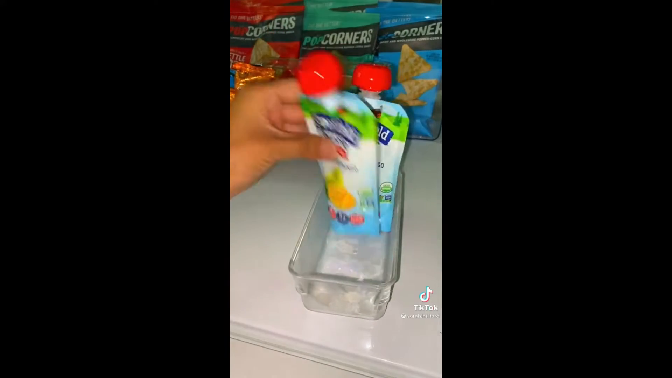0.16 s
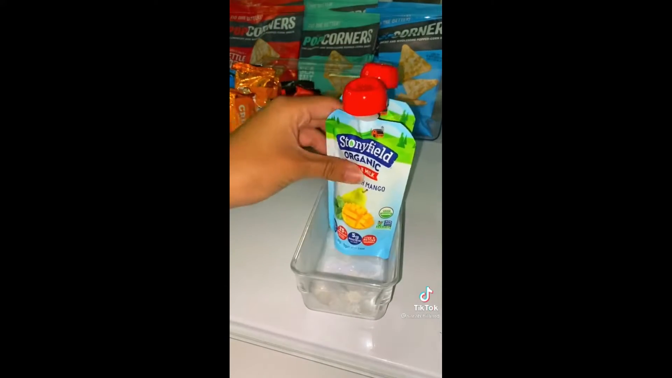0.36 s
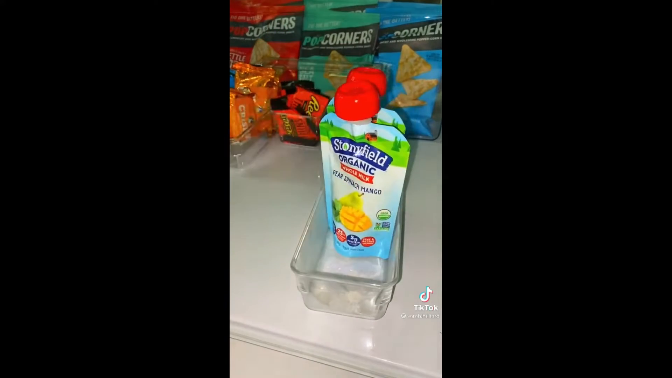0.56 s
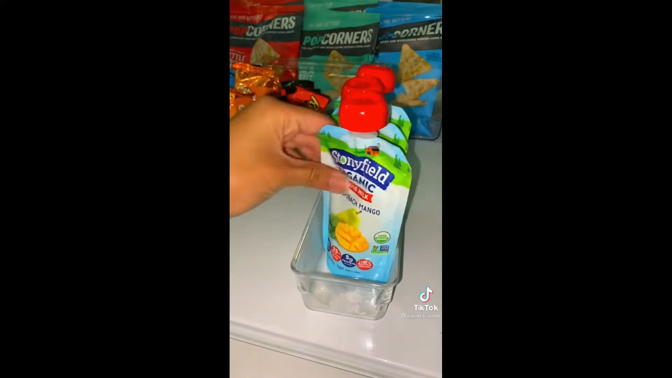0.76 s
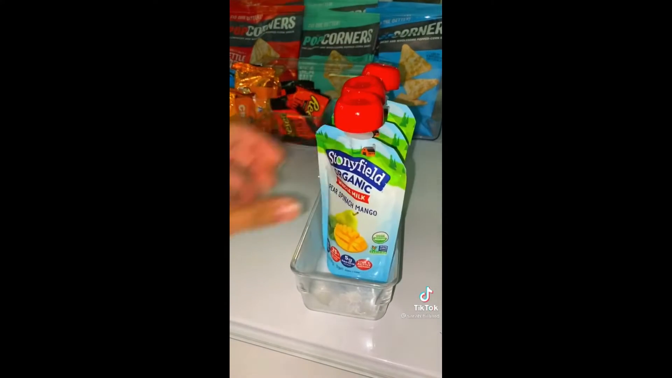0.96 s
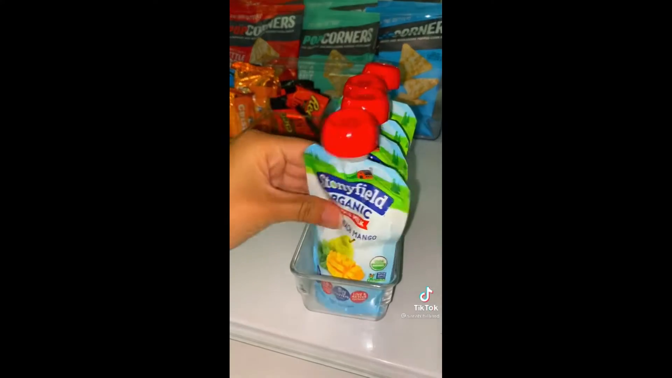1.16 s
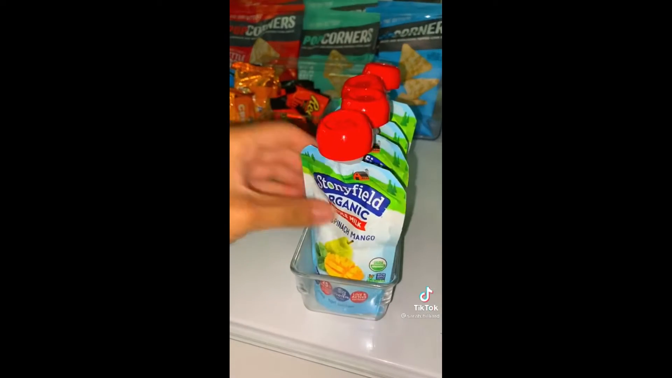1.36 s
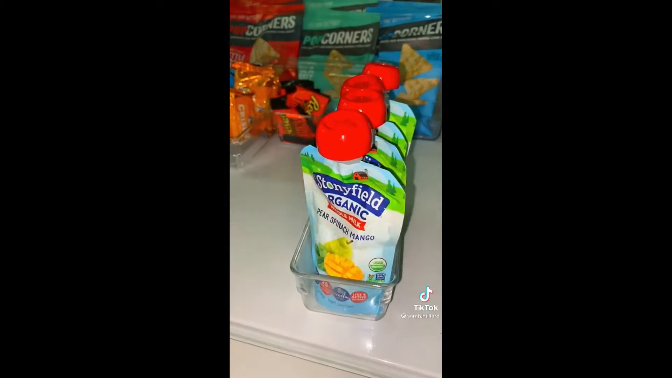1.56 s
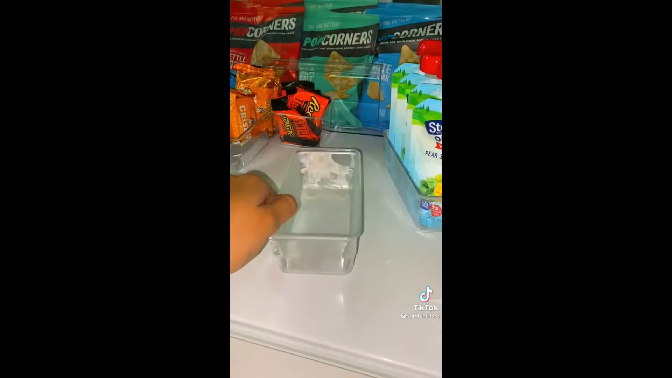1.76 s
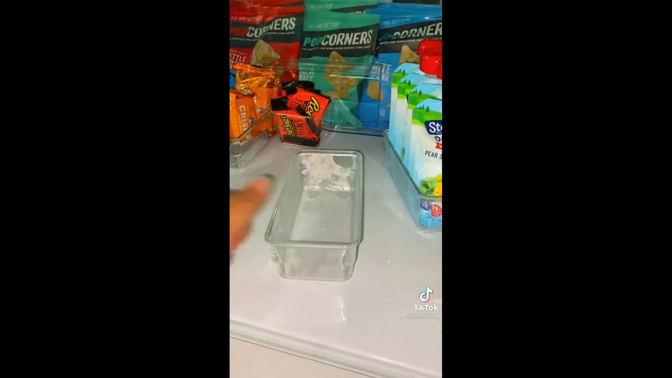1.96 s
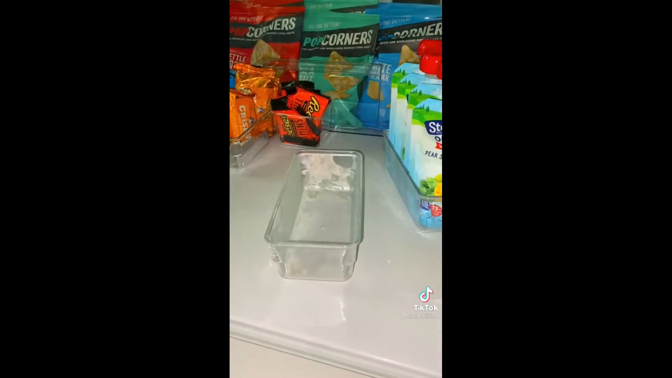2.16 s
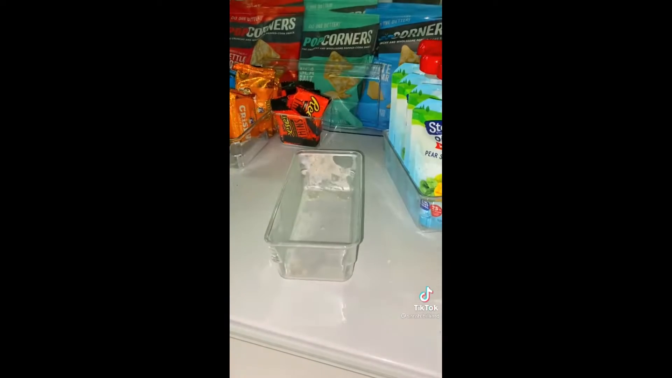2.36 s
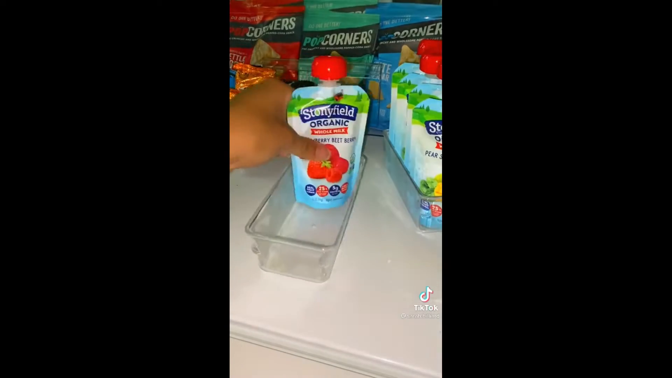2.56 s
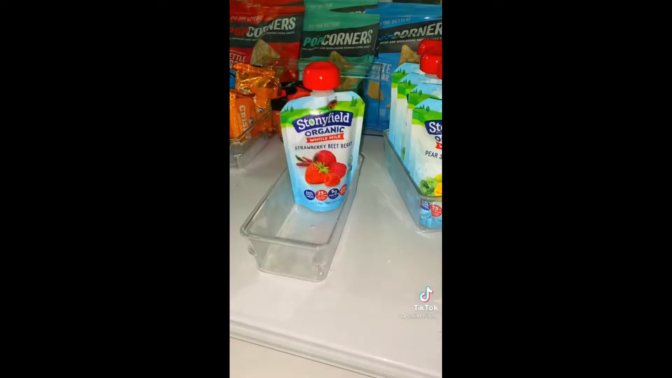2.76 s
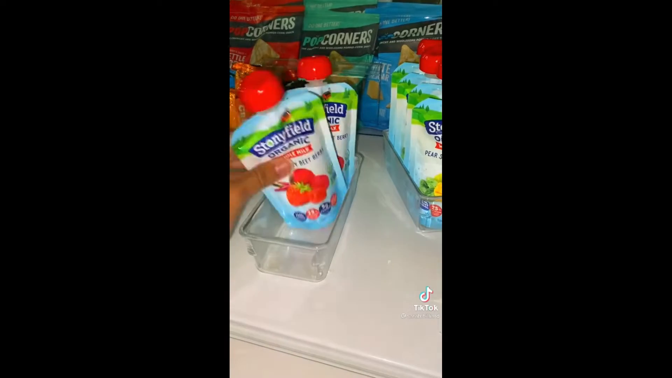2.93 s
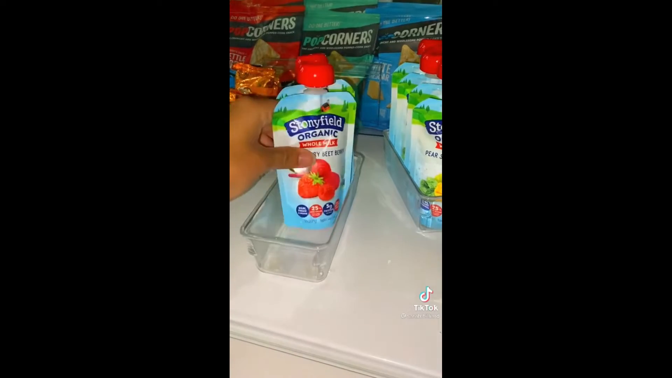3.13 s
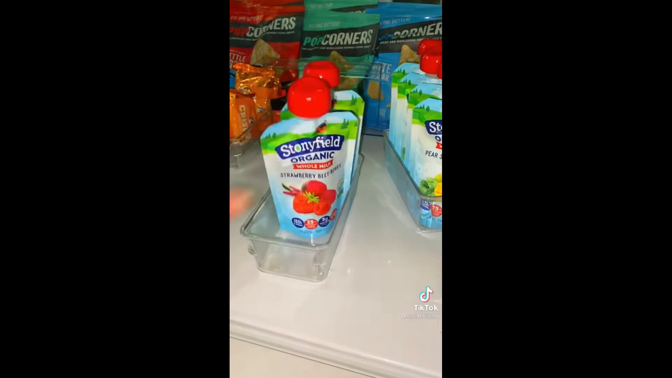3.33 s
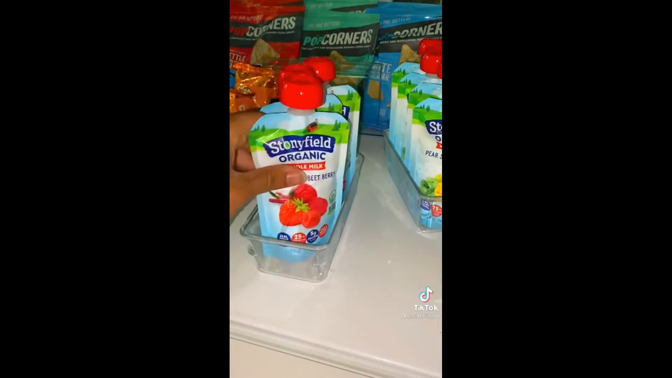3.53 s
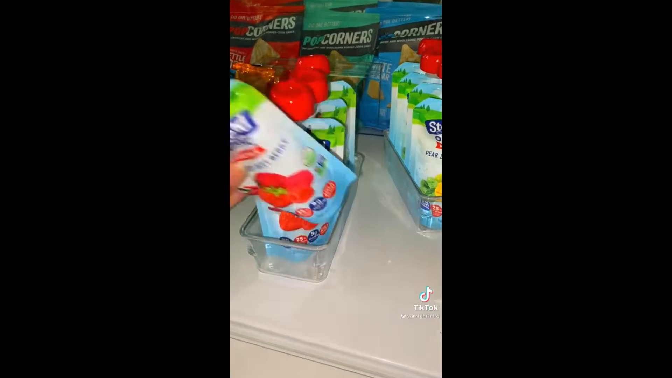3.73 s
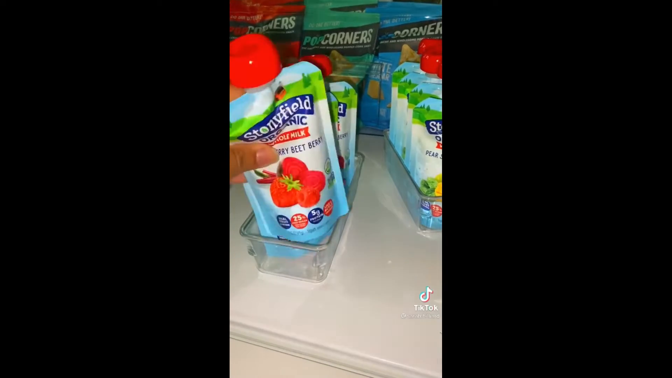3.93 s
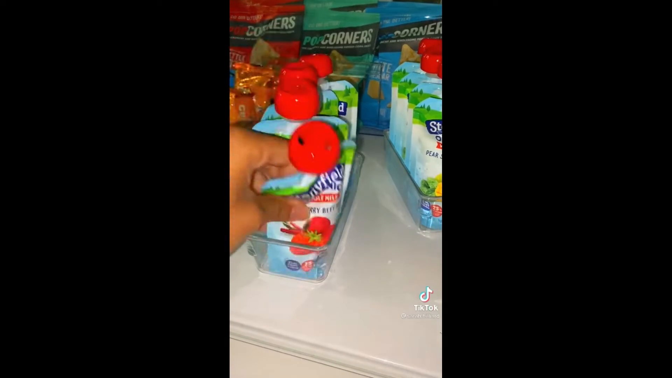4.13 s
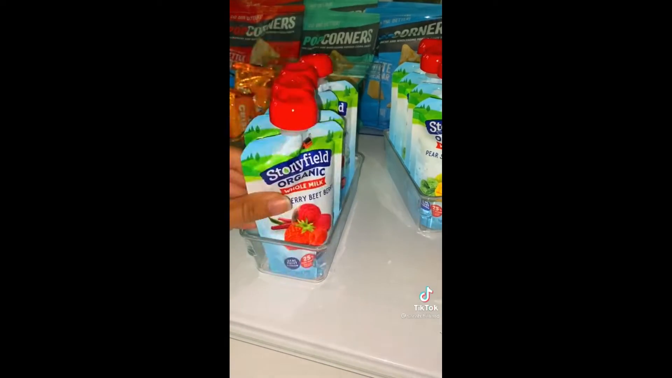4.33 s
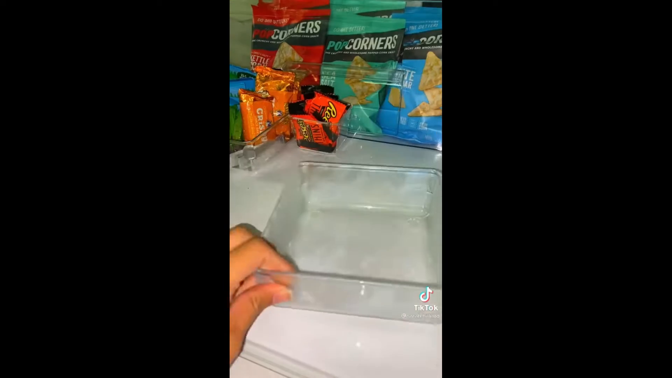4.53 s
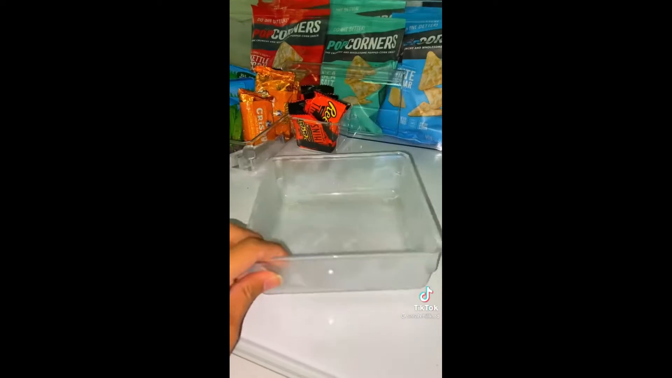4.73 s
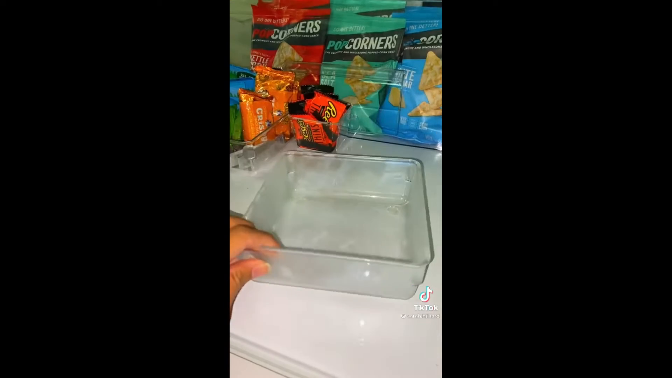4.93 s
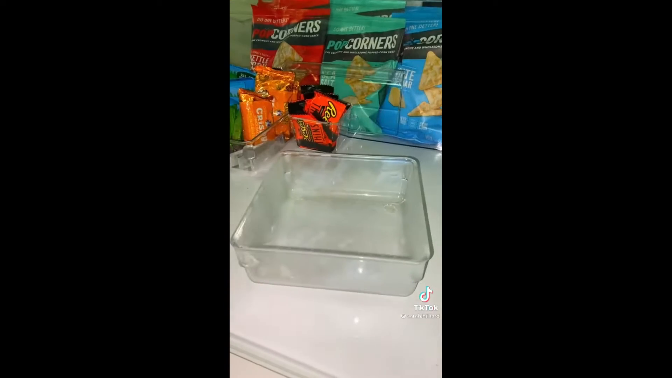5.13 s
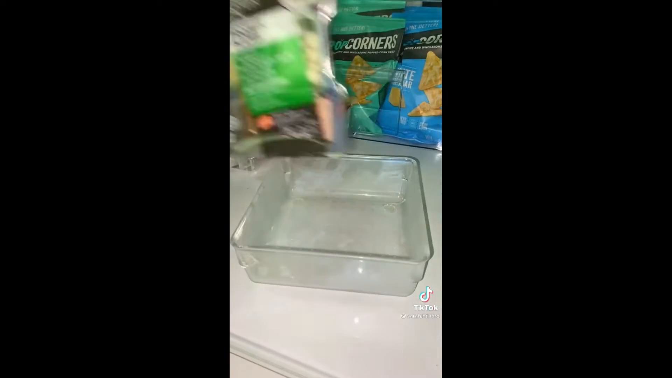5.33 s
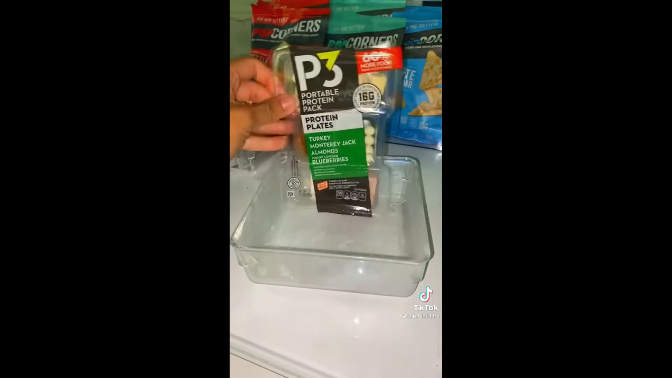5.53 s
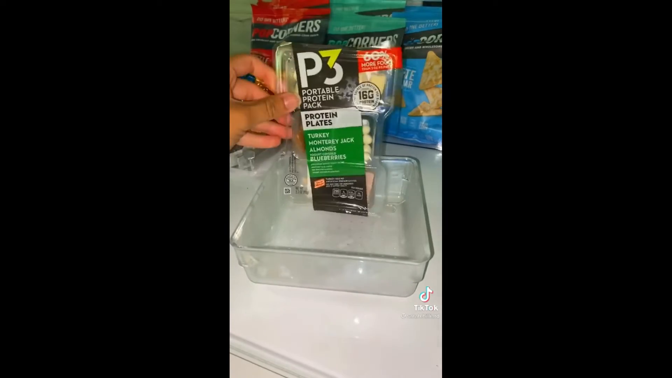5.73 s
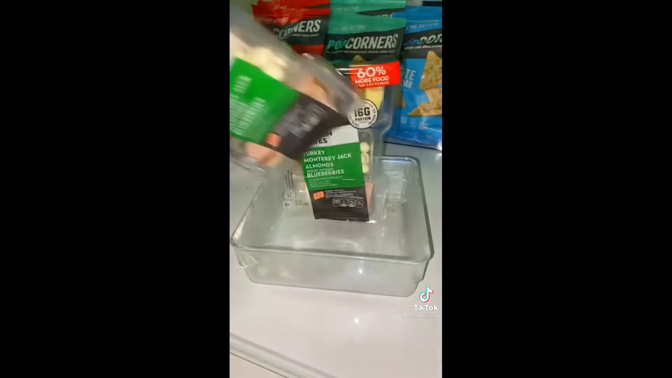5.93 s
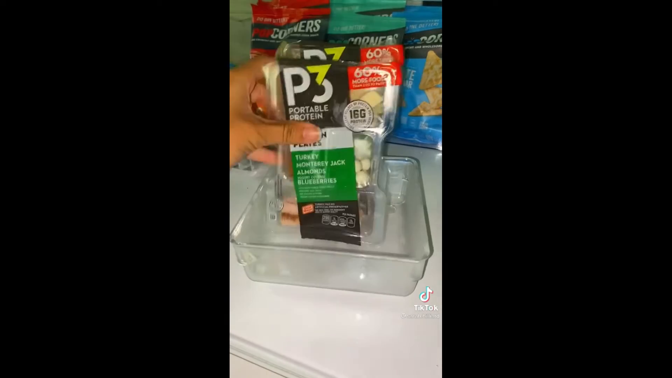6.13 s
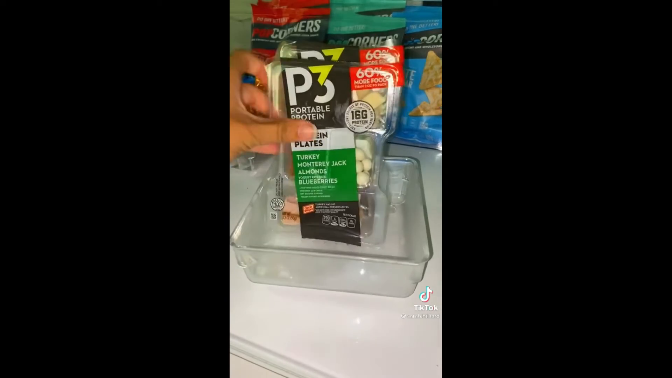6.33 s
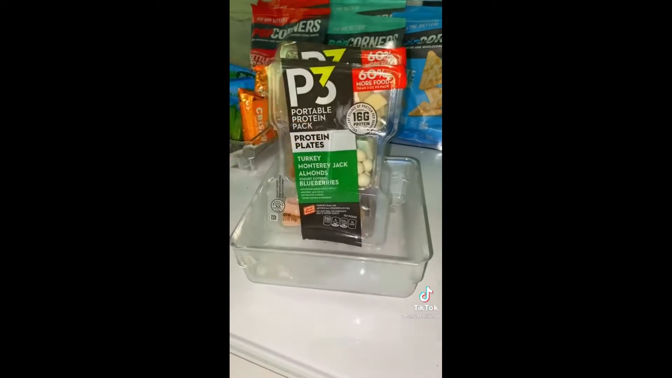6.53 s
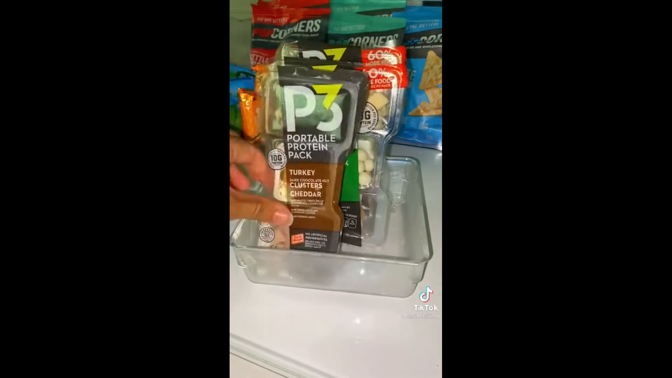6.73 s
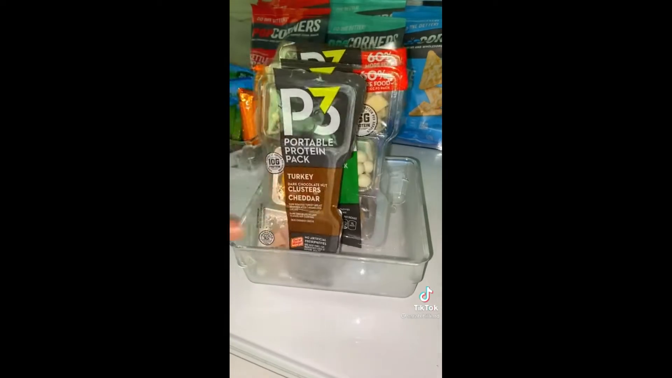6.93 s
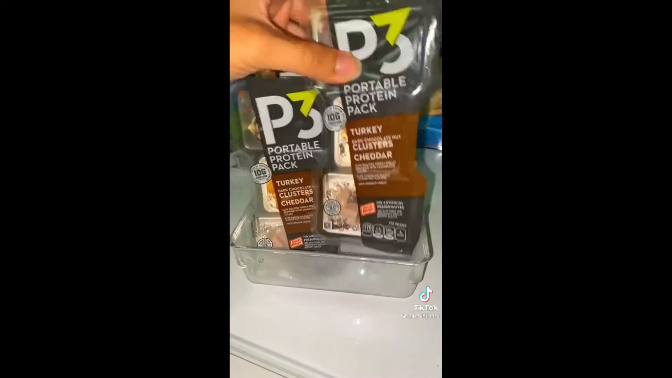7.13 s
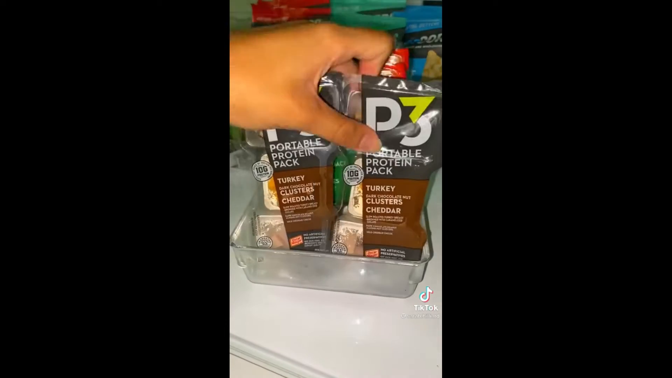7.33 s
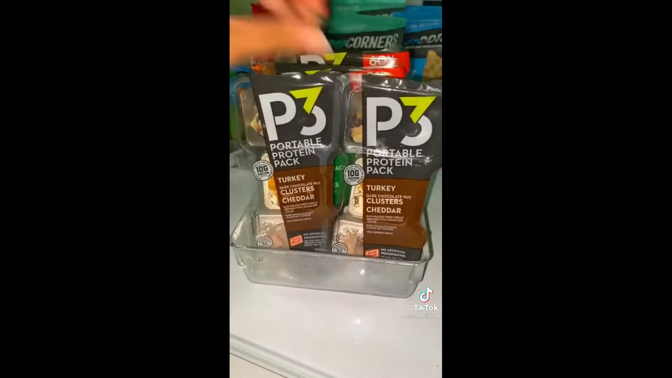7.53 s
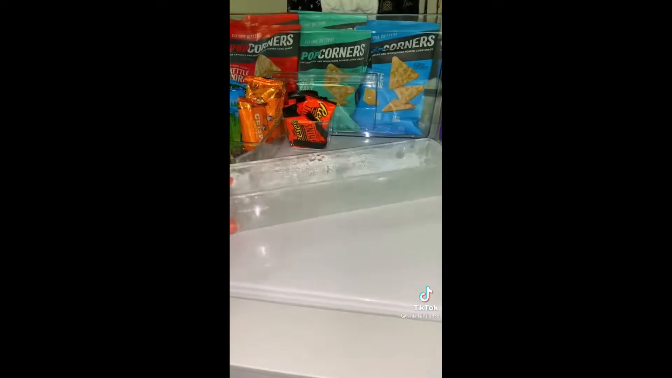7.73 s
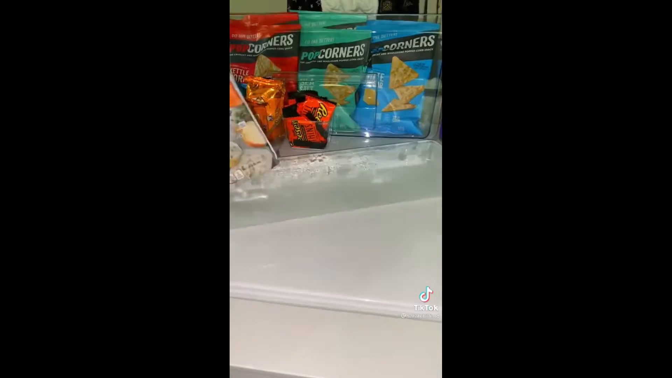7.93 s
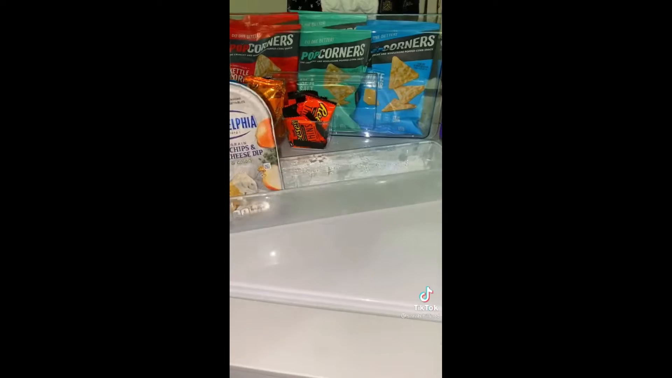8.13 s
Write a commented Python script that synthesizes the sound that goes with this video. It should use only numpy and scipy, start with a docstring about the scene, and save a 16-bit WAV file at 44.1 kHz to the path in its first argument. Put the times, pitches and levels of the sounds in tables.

```python
"""Restocking a fridge

Hard plastic bins knock on a ringing shelf; food pouches and stiff packs land in them or snap against them.
Struck parts are decaying sines plus noise puffs; foil snaps are short clusters of sines with a noisy crack.
Rustle is shaped rubbing noise and tiny folds; the fridge hums and whines faintly in steady air noise.
Rustle, soft bumps and fridge briefly drop out and swell back together, while the hits stay whole."""
import sys
import numpy as np
from scipy import signal
from scipy.fft import rfft, irfft, next_fast_len
from scipy.io import wavfile
from scipy.ndimage import uniform_filter1d

SR = 44100
rng = np.random.default_rng(int(sys.argv[2]) if len(sys.argv) > 2 else 0)


def int16_out(signal):
    """Quantize to a 16-bit WAV file."""
    q = np.round(np.clip(np.atleast_2d(signal).T, -1, 1) * 32767)
    wavfile.write(sys.argv[1], SR, q.astype(np.int16))


N = 365148
T = np.arange(SR // 4) / SR  # seconds within one hit

# All source levels are settings ahead of the mix trims in the functions.
# Fridge air noise colour: pitch_hz, level_db (relative)
AIR_COLOUR = [(25, -40.5), (50, -16.5), (80, -7.5), (120, 0.5), (170, 0), (350, -3.5), (550, -6.5),
              (1000, -19), (1600, -24), (4200, -26), (5500, -34.5), (7500, -31.5), (12000, -40.5),
              (14000, -53.5), (16500, -68)]
# Motor hum and electronic whine: pitch_hz, level_db (average rms, before the dips)
FRIDGE_TONES = [(118.6, -57), (239, -58.5), (829, -67), (3908, -69.5), (4027, -69.5), (4145, -75.5),
                (4624, -84.5), (6282, -85.5), (6638, -78.5), (7989, -84), (11230, -92.5)]
# Brief drops of the background: start_s, depth_db
BACKGROUND_DIPS = [(.12, -20), (0.651, -3), (1.103, -20), (2.405, -19), (2.905, -10), (3.713, -19),
                   (4.43, -16), (5.343, -9.5), (6.571, -32), (7.128, -30), (7.646, -9), (7.91, -20)]
# Soft, low bumps of the hand: start_s, level_db (loudest moment, before the dips)
HAND_BUMPS = [(1.604, -48), (3.658, -41), (4.351, -48), (7.068, -39)]
# Dull thud colour: pitch_hz, level_db (relative)
THUD_COLOUR = [(30, -29), (80, -2.0), (140, 2), (300, -26), (1000, -81.0)]
# A wrapper rubs in the hand or on its neighbours: start_s, length_s, scrape_level_db, hiss_level_db
WRAPPER_RUBS = [(0, 0.03, -47.5, -73), (0.168, 0.065, -52, -48.5), (.52, 0.085, -59, -55.5),
                (0.658, 0.16, -44, -45.5), (1.118, 0.048, -47, -49), (1.345, 0.084, -54.5, -54),
                (1.921, .015, -55.5, -61), (2.34, .05, -62, -59.5), (2.465, .05, -45, -49),
                (2.658, 0.087, -55, -49.5), (2.841, 0.2, -53, -52.5), (3.017, 0.25, -58, -59.5),
                (3.268, 0.082, -50, -48), (3.426, .045, -37.5, -37.5), (3.613, 0.12, -52, -53),
                (3.784, .11, -49, -45.5), (3.93, .11, -49.5, -53.5), (4.089, 0.024, -47, -42.5),
                (4.19, .08, -58.5, -56.5), (5.366, 0.027, -47.5, -56.5), (5.551, .11, -47, -51),
                (5.923, 0.11, -40, -49), (6.033, 0.17, -33.5, -44), (6.322, .05, -47.5, -54.5),
                (6.475, 0.059, -64, -57), (6.599, 0.028, -27, -38.5), (6.654, 0.13, -42, -51.5),
                (7.085, .04, -54, -55.5), (7.159, .14, -40, -42), (7.407, 0.16, -49, -54),
                (7.886, 0.0083, -53, -46.5), (7.968, .025, -28, -41), (8.041, 0.045, -38.5, -51),
                (8.161, .03, -42, -47.5)]
# Rubbing colours, lower scrape and upper hiss: pitch_hz, level_db (relative)
SCRAPE_COLOUR = [(60, -60.5), (250, -24.5), (550, 5.5), (900, -3.5), (1400, 0), (2200, -1.5), (4000, -12.5),
                 (6000, -13.5), (12000, -43.5)]
HISS_COLOUR = [(200, -50.5), (1500, -35.5), (4500, 0.5), (6800, -9), (8200, -0.5), (11800, -4.5),
               (13500, -2), (16500, -22.5)]
# Foil and thin plastic buckle loudly: start_s, body_level_db, crack_level_db, pitch_hz (typical)
FOIL_SNAPS = [(0.055, -40, -31, 3350), (0.161, -29, -32.5, 2270), (0.332, -24.5, -60, 2470),
              (0.595, -41, -45, 2580), (0.814, -26.5, -23, 3740), (0.846, -42, -36.5, 1800),
              (1.184, -28, -24.5, 3720), (1.23, -35.5, -53, 1980), (1.334, -31.5, -31, 3590),
              (2.452, -34, -25, 2400), (2.46, -27.5, -25, 2660), (2.666, -33.5, -30, 1370),
              (2.837, -33, -38.5, 2460), (3.365, -29, -34, 2370), (3.461, -18.5, -11.5, 4600),
              (3.573, -32, -38.5, 2570), (3.741, -30, -38, 3980), (3.793, -33.5, -31.5, 2800),
              (3.924, -26, -30.5, 2900), (4.025, -31.5, -44, 2360), (4.078, -32.5, -55, 1700),
              (4.204, -36.5, -41.5, 1810), (4.325, -28, -41.5, 2200), (5.562, -26, -33, 2140),
              (5.617, -28, -32.5, 2650), (5.73, -37.5, -52.5, 4530), (5.895, -36, -40, 4320),
              (5.934, -22.5, -24.5, 1960), (6.033, -36, -29.5, 1780), (6.134, -9.5, -28.5, 2260),
              (6.174, -17, -48, 1480), (6.227, -27.5, -40.5, 1740), (6.614, -15.5, -26, 2630),
              (6.714, -24, -36, 3210), (6.72, -19, -25, 3180), (6.762, -35, -36.5, 1560),
              (6.829, -32.5, -38, 2190), (7.1, -29.5, -32.5, 1310), (7.121, -30.5, -30, 3700),
              (7.172, -22.5, -20.5, 4140), (7.189, -16.5, -33, 2590), (7.214, -18, -23, 1460),
              (7.225, -19.5, -16.5, 2120), (7.26, -26.5, -26, 3070), (7.287, -25, -24, 3080),
              (7.389, -20.5, -35, 1690), (7.404, -17.5, -27, 2190), (7.443, -9, -13, 2725),
              (7.976, -24, -28.5, 1560), (8.154, -26.5, -37, 2740)]
# A pouch or pack lands in a bin, or, where the thump is faint, a wrapper snaps against it:
# start_s, thump_level_db, clack_level_db, crack_level_db
PACK_CONTACTS = [(0.019, -36, -41.5, -59), (0.097, -42.5, -47.5, -67.5), (0.222, -14, -10.5, -15),
                 (0.233, -47.5, -23, -31), (0.251, -51, -21.5, -26), (0.414, -42, -40.5, -64.5),
                 (0.679, -33, -35, -58), (0.74, -22.5, -15.5, -18), (0.759, -28, -23.5, -39.5),
                 (0.793, -35, -38, -52), (1.152, -24, -14.5, -23.5), (1.16, -24, -33, -21.5),
                 (2.473, -26.5, -30, -41.5), (2.503, -31.5, -26, -34.5), (2.535, -33, -33.5, -35.5),
                 (2.629, -28, -41.5, -48), (2.961, -17.5, -16, -24.5), (3.05, -24, -42.5, -27.5),
                 (3.062, -58, -28.5, -47), (3.314, -28, -27.5, -40), (3.345, -36, -31.5, -39),
                 (3.411, -33.5, -29, -31), (3.436, -27, -17, -32), (3.647, -35, -39, -51),
                 (3.678, -34, -31.5, -28.5), (3.812, -29, -16, -36), (3.835, -37.5, -35, -41),
                 (3.886, -44.5, -33, -45), (4.013, -33.5, -32.5, -44), (4.108, -36, -11, -10),
                 (4.12, -21, -12, -20), (5.523, -21.5, -19, -23), (5.55, -21.5, -22, -31.5),
                 (5.993, -31, -17.5, -28), (6.144, -9, -10, -19.5), (6.598, -29, -34.5, -33),
                 (6.677, -31, -35.5, -52), (6.701, -31.5, -28.5, -32), (7.949, -18.5, -14.5, -28),
                 (7.958, -21, -21, -26.5), (8.019, -14.5, -16.5, -39), (8.043, -16.5, -18, -26)]
# A bin bumps on the shelf: start_s, thump_level_db, clack_level_db, crack_level_db,
# hardness_db_per_octave
BIN_KNOCKS = [(1.673, -30.5, -68, -78, -5.5), (1.7645, -12, -33.5, -39.5, 16), (1.782, -31, -52, -48, 7),
              (1.821, -35, -50, -67, -16), (1.84, -25, -50, -53.5, 9.5), (4.52, -17.5, -34.5, -56, 1),
              (4.527, -4.5, -35, -46, 2), (4.551, -15.5, -27, -34.5, 8), (4.679, -17.5, -36, -45, 5.5),
              (4.723, -16, -50, -65.5, -1.5), (4.8, -30.5, -68, -82, -6), (4.897, -35, -46, -41, -9),
              (4.961, -15, -44, -75, 5), (5.062, -21, -38.5, -41.5, 15), (5.097, -38, -43.5, -54.5, 3),
              (7.679, -3.5, -14.5, -21, 7), (7.696, -13, -32, -40, 2.5)]
# Resonances of the shelf with a bin on it: pitch_hz, level_db (relative), t60_s
SHELF_MODES = [(241.4, -33, 0.19), (313, -11.5, 0.04), (362, -16.5, 0.071), (488.8, -4.5, 0.071),
               (559, 5, 0.077), (630, -0.5, 0.02), (696.5, -5.5, 0.073), (769, -6.5, 0.069),
               (897, -11.5, 0.032), (1043, -20.5, 0.11), (1518, -30.5, 0.023)]
# Resonances of the bin walls: pitch_hz, level_db (relative), t60_s
BIN_MODES = [(1136, -6.5, .035), (1404, -2, 0.079), (1470, -2, 0.026), (1773, -11.5, 0.024),
             (1992, 3, 0.045), (2215, 5, 0.023), (2500, 5.5, 0.029), (2676, 4.5, 0.028), (3420, -18.5, .04),
             (4400, -8, .035), (5250, -18, 0.059)]
# Contact colours, clack, bright crack and bin chatter on the shelf: pitch_hz, level_db (relative)
CLACK_COLOUR = [(60, -64.5), (200, -11.5), (600, -7.5), (1200, -3.5), (2200, 0), (3200, -4.5), (4500, -6.5),
                (6500, -23), (12000, -27.5)]
CRACK_COLOUR = [(100, -59), (500, -34), (2500, -19), (4800, 0), (7000, -8), (10500, -7.5), (12500, -8.5),
                (14000, -8.5), (16500, -38)]
CHATTER_COLOUR = [(150, -24), (400, -11.5), (550, -1), (1050, -5.5), (1300, -22), (1550, -16.5),
                  (2500, -48)]
# Level difference of the microphone ports: pitch_hz, left_minus_right_db
PORT_BALANCE = [(100, 0), (700, -0.9), (1290, -4.5), (2380, 0), (4400, -2.1), (8100, -2), (15000, 0.5)]
# Phase difference of the microphone ports: pitch_hz, left_lead_rad
PORT_LEAD = [(700, 0), (1100, -.3), (1500, -.1), (2500, -.1), (3600, 0), (6200, .6), (8500, -.2),
             (10500, .2), (11600, .9), (12600, 2.6), (14000, 3.1)]

RUB_RISE_DB_PER_S, RUB_FALL_DB_PER_S = 618, 329  # a rub starts quickly and settles more slowly
RUB_SAG_DB = 5  # it eases off between its start and its end
RUB_TOP_HZ = 13300  # the hiss has little above this
# Small snaps: levels over the scrape and hiss of their rub, and random spread of level
CRACKLE_BODY_DB, CRACKLE_CRACK_DB, CRACKLE_SCATTER_DB = 2, 7, 2.5
CRACKLE_HZ, CRACKLE_SPREAD = 2217, .3  # their usual pitch and its log spread
# dB per octave at a thump setting of 0 dB; softer contacts are duller
CONTACT_HARDNESS, HARDER_PER_DB = 8.6, 0.63
TOP_HZ = 16600  # upper edge of the band


def amp(db):
    """Turn decibels into gain."""
    return 10 ** (np.asarray(db) / 20)


def unit(x):
    """Scale to rms 1."""
    return x / np.sqrt(np.mean(x ** 2) + 1e-20)


def burst(x, size=96):
    """Scale a hit so that its loudest stretch of size samples has rms 1."""
    power = np.atleast_2d(x ** 2).mean(0)
    loudest = uniform_filter1d(power, size, mode="constant").max()
    return x / np.sqrt(loudest + 1e-20)


def along(points, hz):
    """Read a curve of (Hz, value) points on a log frequency axis."""
    point_hz, value = np.transpose(points)
    return np.interp(np.log(hz + 1), np.log(point_hz + 1), value)


def filtered(x, response):
    """Shape a sound with a gain that depends on frequency."""
    n = x.shape[-1]
    size = next_fast_len(n + 2048)
    spectrum = rfft(x, size) * response(np.fft.rfftfreq(size, 1 / SR))
    return irfft(spectrum, size)[..., :n]


def noise(colour, n, ripple_db=0, apart=0.39):
    """Coloured stereo noise of rms 1, nearly alike left and right, with optional random resonances."""
    white = rng.standard_normal(n) + apart * rng.standard_normal((2, n))
    knots_hz = np.geomspace(200, 16000, 60)
    ripple = ripple_db * rng.standard_normal(len(knots_hz))
    return unit(filtered(white, lambda hz: amp(along(colour, hz) + np.interp(hz, knots_hz, ripple))))


def wobble(rate):
    """A random curve of straight segments, with rate knots a second."""
    return np.interp(np.arange(N) * rate / SR, np.arange(N // 8), rng.standard_normal(N // 8))


def fade(t60):
    """A decay of 60 dB in t60 seconds."""
    return np.exp(-np.log(1000) * T / t60)


def press(rise):
    """A contact builds up over about rise seconds."""
    return 1 - np.exp(-(T / rise) ** 2)


def add(track, start_s, hit):
    """Mix a hit into a track, cut off at the track's end."""
    part = track[..., max(0, round(start_s * SR)):][..., :hit.shape[-1]]
    part += hit[..., :part.shape[-1]]


def flex(x, depth_db):
    """Let patches of the spectrum swell and sink at random, as when a bending wrapper shifts its resonances."""
    spectrum = signal.stft(x, nperseg=512)[2]
    field = rng.standard_normal(spectrum.shape[1:])
    field = uniform_filter1d(field, size=4, axis=0)  # smooth over frequency
    field = uniform_filter1d(field, size=6, axis=1)  # smooth over time
    return unit(signal.istft(spectrum * amp(depth_db * unit(field)), nperseg=512)[1][:, :N])


def dips():
    """Gain of the background: sudden drops, each with a quick swell back."""
    db = np.zeros(N)
    for start_s, depth_db in BACKGROUND_DIPS:
        add(db, start_s, depth_db * np.clip(1 - T / 0.041, 0, 1))
    return amp(db)


def fridge():
    """Fan noise with the motor's hum and a thin, slightly unsteady whine."""
    t = np.arange(N) / SR
    tones = np.zeros(N)
    for pitch_hz, level_db in FRIDGE_TONES:
        level = amp(level_db + 1.1 * wobble(5.6)) * np.sqrt(2)  # sine peak from rms
        tones += level * np.sin(2 * np.pi * pitch_hz * t + .5 * wobble(7))
    air_level = amp(-50.0 + .5 * wobble(10))
    return air_level * flex(noise(AIR_COLOUR, N, apart=0.3), depth_db=3.16) + tones


def bumps():
    """Soft hand bumps: low noise with a slow onset and no ring."""
    track = np.zeros((2, N))
    for start_s, level_db in HAND_BUMPS:
        thud = noise(THUD_COLOUR, len(T)) * press(0.02) * fade(0.15)
        add(track, start_s, amp(level_db) * burst(thud, size=800))
    return track


def creases(colour, rate, spread_db):
    """Many tiny folds: noise clicks of unequal size, rate a second, each with a short wash of reflections."""
    size = amp(spread_db * np.minimum(rng.standard_exponential(N), 2))
    clicks = (rng.random(N) < rate / SR) * size
    decay = fade(0.018) ** 2 + amp(-11.0) ** 2 * fade(0.045) ** 2  # power of click and wash
    power = signal.fftconvolve(clicks ** 2, decay)[:N]
    return unit(noise(colour, N) * np.sqrt(np.abs(power)))


def stroke(length):
    """Gain of one rub: it rises in the len(T) samples before its start, sags while it lasts and dies away."""
    t = np.arange(-len(T), SR // 2) / SR
    sag_db = RUB_SAG_DB * (.5 - np.clip(t / length, 0, 1))
    rise_db = RUB_RISE_DB_PER_S * np.minimum(t, 0)
    fall_db = RUB_FALL_DB_PER_S * np.maximum(t - length, 0)
    return amp(sag_db + rise_db - fall_db)


def rustle():
    """Moving wrappers crinkle on top of a smooth rubbing noise; one stroke drives both scrape and hiss."""
    power = np.zeros((2, len(T) + N))  # room ahead for the rise of the first rub
    for start_s, length_s, scrape_db, hiss_db in WRAPPER_RUBS:
        add(power, start_s, np.outer(amp([scrape_db, hiss_db]), stroke(length_s)) ** 2)
    scrape_gain, hiss_gain = np.sqrt(power[:, len(T):])
    scrape = creases(SCRAPE_COLOUR, rate=280, spread_db=9.5) + 0.45 * noise(SCRAPE_COLOUR, N)
    hiss = 0.51 * creases(HISS_COLOUR, rate=200, spread_db=15.0) + 0.96 * noise(HISS_COLOUR, N)
    scrape = flex(scrape, depth_db=5.0)
    hiss = flex(hiss, depth_db=4.5)
    hiss = filtered(hiss, lambda hz: 1 / np.hypot(1, (hz / RUB_TOP_HZ) ** 20))
    return scrape * scrape_gain + 0.53 * hiss * hiss_gain


def puff(colour, t60, tail_db, tail_t60, rise=0.0006):
    """A noisy contact with its reflections inside the fridge."""
    direct = noise(colour, len(T), ripple_db=6.0) * fade(t60) * press(rise)
    echoes = noise(colour, len(T), ripple_db=6) * fade(tail_t60) * press(0.0039)
    return burst(direct + amp(tail_db) * echoes)


def dimple(pitch_hz, spread, t60, count=5):
    """A patch of stiff film flips over and rings briefly at its own few pitches."""
    hz = np.minimum(pitch_hz * np.exp(spread * rng.standard_normal(count)), SR / 3)
    cycles = np.outer(hz, T) + rng.random((count, 1))
    return burst(np.sin(2 * np.pi * cycles).sum(0) * fade(t60) * press(0.0011))


def snap(body_db, crack_db, pitch_hz):
    """One sharp, weightless click of a wrapper: ringing film and a noisy contact under a bright crack."""
    film = dimple(pitch_hz, spread=.25, t60=0.017)
    contact = puff(CLACK_COLOUR, t60=0.02, tail_db=-8.0, tail_t60=0.07)
    body = 0.6 * film + 0.45 * contact
    crack = 0.9 * puff(CRACK_COLOUR, t60=0.011, tail_db=-21.5, tail_t60=0.073)
    return amp(body_db) * body + amp(crack_db) * crack


def crackles(count=2):
    """Every rub sets off a few small snaps at chance moments, louder when it is firmer."""
    track = np.zeros((2, N))
    for start_s, length_s, scrape_db, hiss_db in WRAPPER_RUBS:
        for place, (size, pitch) in zip(rng.random(count), rng.standard_normal((count, 2))):
            scatter_db = CRACKLE_SCATTER_DB * size
            body_db = scrape_db + CRACKLE_BODY_DB + scatter_db
            crack_db = hiss_db + CRACKLE_CRACK_DB + scatter_db
            click = snap(body_db, crack_db, CRACKLE_HZ * np.exp(CRACKLE_SPREAD * pitch))
            add(track, start_s + place * length_s, click)
    return track


def snaps():
    """The wrappers buckle as they are gripped, pushed in and let go."""
    track = np.zeros((2, N))
    for start_s, body_db, crack_db, pitch_hz in FOIL_SNAPS:
        add(track, start_s, snap(body_db, crack_db, pitch_hz))
    return track


def ring(modes, scatter_db, detune, tilt_db):
    """Modes of alternating sign; each blow has new random strengths and slightly different mode pitches."""
    hz, db, t60 = np.transpose(modes)
    strength, shift = rng.standard_normal((2, len(hz)))
    level_db = db + scatter_db * strength + tilt_db * np.log2(hz / hz.mean())
    gain = amp(level_db) * (-1) ** np.arange(len(hz))
    waves = np.sin(2 * np.pi * np.outer(hz * (1 + detune * shift), T))
    return burst(gain @ (waves * fade(t60[:, None])) * press(0.0015))


def thump(hardness, rattle_db):
    """The shelf rings, with more of its upper modes under a harder contact, and the bin chatters on it."""
    modes = ring(SHELF_MODES, scatter_db=2.0, detune=0.018, tilt_db=max(hardness, -6))
    chatter = puff(CHATTER_COLOUR, t60=0.039, tail_db=-13.5, tail_t60=0.1, rise=0.00086)
    return burst(modes + amp(rattle_db + hardness / 2) * chatter)


def pack_contacts():
    """A pack thumps the shelf through the bin, or a wrapper snaps on it faintly; walls clack, wrapper cracks."""
    track = np.zeros((2, N))
    for start_s, thump_db, clack_db, crack_db in PACK_CONTACTS:
        hardness = CONTACT_HARDNESS + HARDER_PER_DB * thump_db
        walls = ring(BIN_MODES, scatter_db=3.5, detune=0.017, tilt_db=-0.5)
        contact = puff(CLACK_COLOUR, t60=0.015, tail_db=-13.5, tail_t60=0.095, rise=0.0014)
        clack = 0.77 * walls + 0.53 * contact
        crack = puff(CRACK_COLOUR, t60=0.018, tail_db=-17.0, tail_t60=0.078, rise=0.0022)
        hit = amp(thump_db + 2.0) * thump(hardness, rattle_db=-8)
        add(track, start_s, hit + amp(clack_db) * clack + amp(crack_db) * crack)
    return track


def knocks():
    """The rigid bin sets the whole shelf ringing, and its walls and contact noise add clack and crack."""
    track = np.zeros((2, N))
    for start_s, thump_db, clack_db, crack_db, hardness in BIN_KNOCKS:
        walls = ring(BIN_MODES, scatter_db=10.0, detune=0.016, tilt_db=18.0)
        contact = puff(CLACK_COLOUR, t60=0.039, tail_db=-13.5, tail_t60=0.14)
        clack = 0.2 * walls + 1.45 * contact
        crack = puff(CRACK_COLOUR, t60=0.018, tail_db=-17.0, tail_t60=0.068, rise=0.0017)
        hit = amp(thump_db) * thump(hardness, rattle_db=-10.5)
        add(track, start_s, hit + amp(clack_db - 4.5) * clack + amp(crack_db - 2.0) * crack)
    return track


def kitchen(x, t60, wet_db):
    """A faint diffuse answer from the room, unrelated in the two channels."""
    tail = rng.standard_normal((2, len(T))) * fade(t60) * (1 - fade(.05))
    wet = signal.fftconvolve(x, tail / np.linalg.norm(tail[0]), axes=1)[:, :N]
    return x + amp(wet_db) * wet


def scene():
    """Bins, packs and snapping wrappers in the kitchen, over the dipping rustle, bumps and fridge."""
    background = dips() * (fridge() + bumps() + rustle())
    hits = crackles() + snaps() + pack_contacts() + knocks()
    return background + kitchen(hits, t60=0.24, wet_db=-25.5)


def record(dry):
    """Two microphone ports differ in level and phase; peaks over full scale clip, then both band ends are cut."""
    sides = np.array([[.5], [-.5]])  # left and right each take half the difference

    def port_response(hz):
        """Level and phase of each port."""
        return amp(sides * along(PORT_BALANCE, hz)) * np.exp(1j * sides * along(PORT_LEAD, hz))

    clipped = np.clip(filtered(dry, port_response), -1, 1)
    low_cut = signal.butter(2, 45, "highpass", fs=SR, output="sos")
    return filtered(signal.sosfilt(low_cut, clipped), lambda hz: hz < TOP_HZ)


dry = scene()
out = record(dry)
int16_out(out)
```